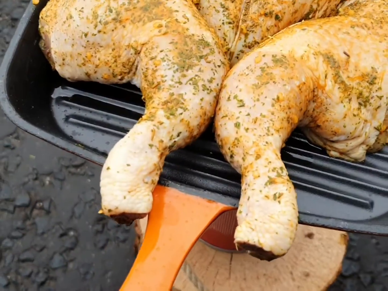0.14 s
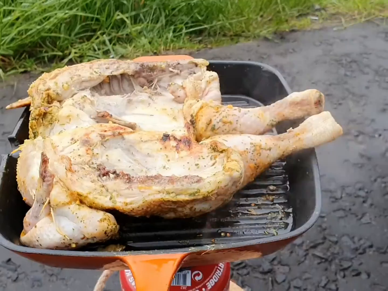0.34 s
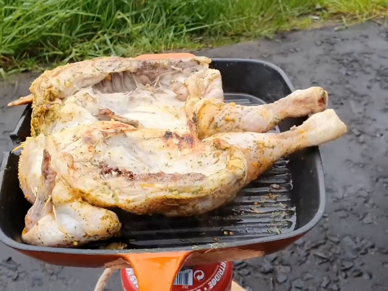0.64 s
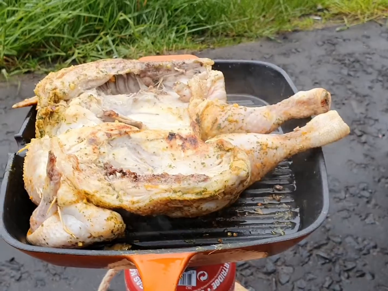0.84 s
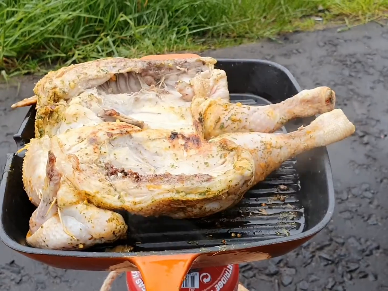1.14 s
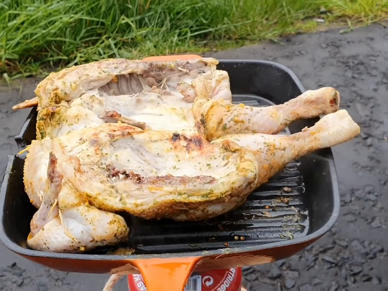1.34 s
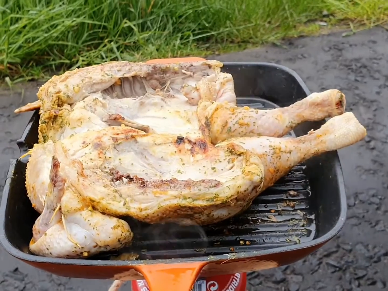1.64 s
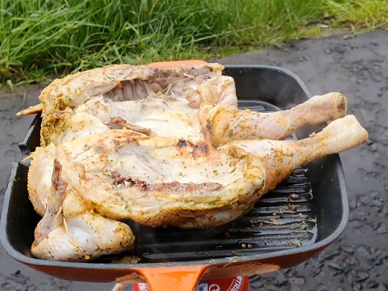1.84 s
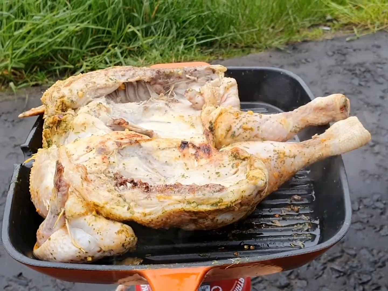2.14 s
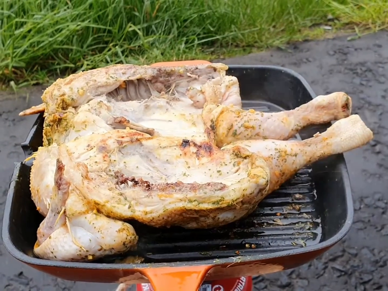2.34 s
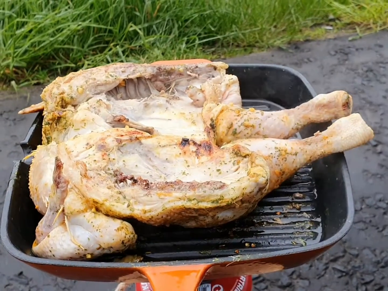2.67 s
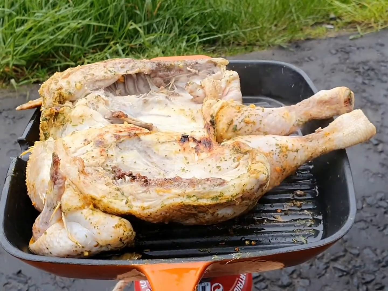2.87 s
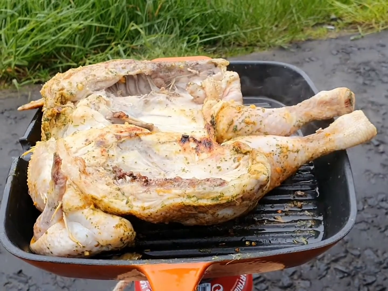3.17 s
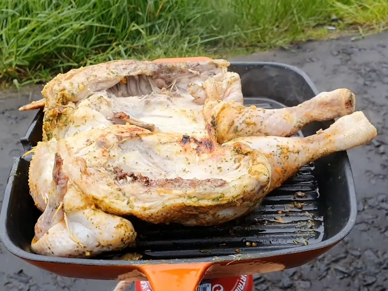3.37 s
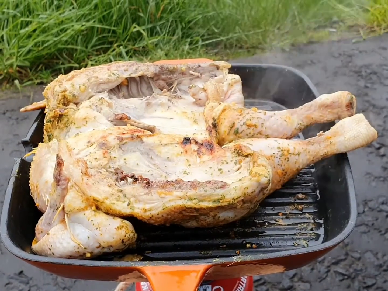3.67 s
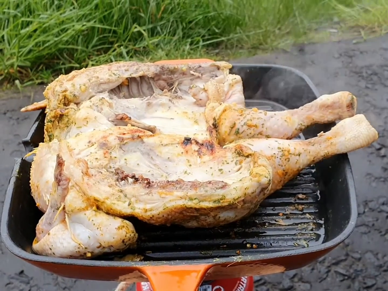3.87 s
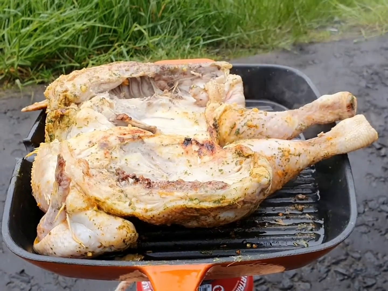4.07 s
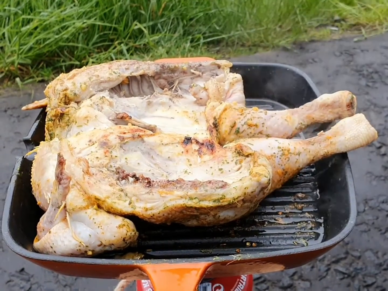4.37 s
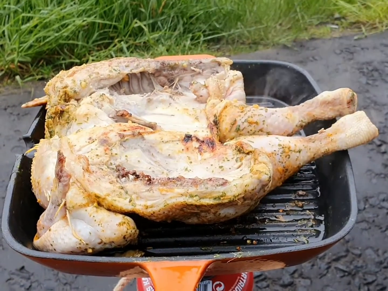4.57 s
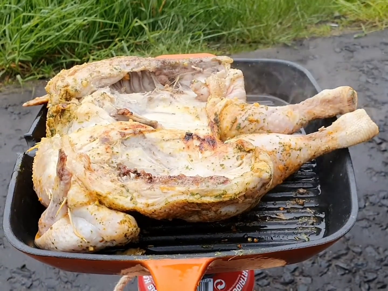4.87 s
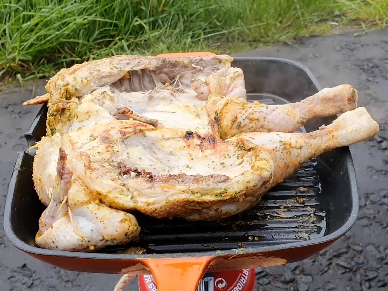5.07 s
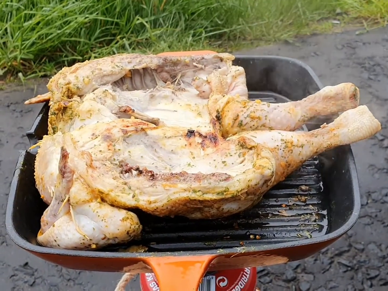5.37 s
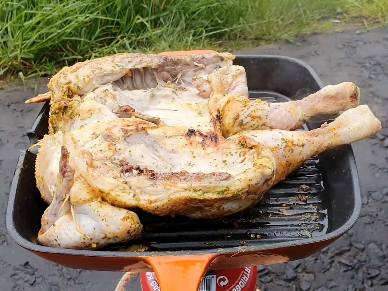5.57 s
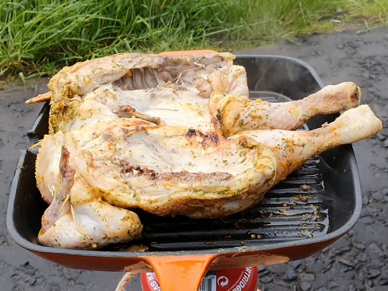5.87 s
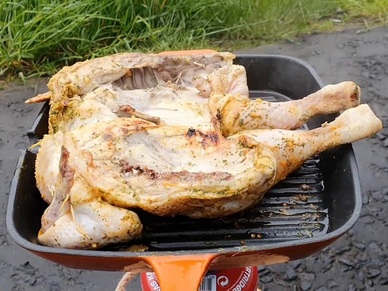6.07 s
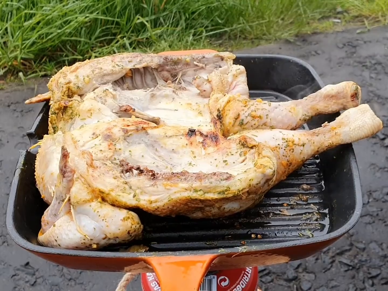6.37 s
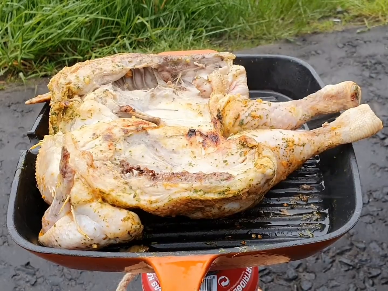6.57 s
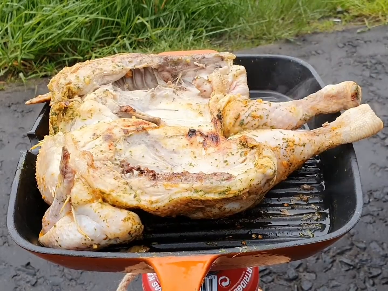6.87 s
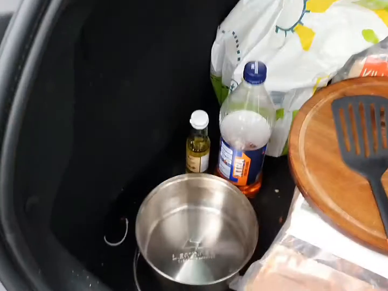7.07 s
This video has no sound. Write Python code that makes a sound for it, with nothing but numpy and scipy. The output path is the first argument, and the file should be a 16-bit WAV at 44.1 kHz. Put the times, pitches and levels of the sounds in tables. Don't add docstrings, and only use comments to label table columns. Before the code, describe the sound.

A hand-held stereo microphone sits an arm's length from a frying pan on an outdoor gas stove. First comes a snippet of sizzle with low wind buffeting mainly on the left and faint rustling; after a blink of silence, continuous wet frying follows, irregularly scattered with dry cracks, rounder ringing pops and tiny spits. Underneath lie soft burner roar, traffic murmur and a wavering far engine. It cuts briefly again at the end.

```python
import sys
import numpy as np
from scipy import signal
from scipy.fft import rfft, irfft, next_fast_len
from scipy.io import wavfile
from scipy.ndimage import map_coordinates

SR = 44100
rng = np.random.default_rng(int(sys.argv[2]) if len(sys.argv) > 2 else 0)


def wav_out(sig):
    wavfile.write(sys.argv[1], SR, np.round(np.clip(np.atleast_2d(sig).T, -1, 1) * 32767).astype(np.int16))


def invert_db(x):
    u = np.asarray(x, float) / 20
    return 10 ** u


N = 318519


def unit(x):
    return x / np.sqrt(np.mean(x ** 2) + 1e-20)


def along(points, hz):
    f, v = np.transpose(points)
    return np.interp(np.log(hz + 1), np.log(f + 1), v)


def curves(rows):
    s, *cols = np.transpose(rows)
    return [np.interp(np.arange(N) / SR, s, c) for c in cols]


def wobble(rate):
    knots = rng.standard_normal(int(N * rate / SR) + 4)
    return map_coordinates(knots, [np.arange(N) * rate / SR])


def swell(s, half_s):
    return np.exp(-.5 * ((np.arange(N) / SR - s) / half_s) ** 2)


def filtered(x, response):
    n = x.shape[-1]
    m = 2 * next_fast_len(n // 2 + 4096, real=True)
    return irfft(rfft(x, m) * response(np.fft.rfftfreq(m, 1 / SR)), m)[..., :n]


def coloured_noise(points):
    return filtered(rng.standard_normal((2, N)), lambda f: invert_db(along(points, f)))


# frequency in Hz, level in dB per Hz.
MURMUR_SPECTRUM = [(15, -51), (30, -27), (40, -15), (62, -8), (85, -6.5), (107, -11), (134, -14),
                   (189, -10), (389, -20), (557, -12.5), (900, -24.5), (1170, -41), (1980, -120)]


def outdoor_murmur():
    mid, side = coloured_noise(MURMUR_SPECTRUM)
    side = filtered(side, lambda f: invert_db(along([(100, -18.5), (300, -18.0), (700, -8.5)], f)))
    growth_db = 0.4453 * np.arange(N) / SR
    level_db = -51.5 + growth_db + 0.85 * wobble(1.55) + 0.75 * wobble(5)
    return invert_db(level_db) * np.array([mid + side, mid - side]) / np.std(mid)


# centre in seconds, half length in seconds, level in dB.
RUSTLE_SWELLS = [
    (.05, .08, -55),
    (.33, .06, -53),
    (2.58, .09, -59),
]
# frequency in Hz, level in dB.
RUSTLE_SPECTRUM = [(150, -40), (260, 0), (400, 0), (600, -40)]


def rustle():
    near, far = unit(coloured_noise(RUSTLE_SPECTRUM))
    level = sum(invert_db(db) * swell(s, half_s) for s, half_s, db in RUSTLE_SWELLS)
    return level * (near + .4 * far * np.array([[1], [-1]]))


# time in seconds, note in Hz, level in dB.
ENGINE_PATH = [(.42, 78.7, -43), (1.45, 79.2, -42), (1.9, 82, -45), (2.2, 83.3, -38.5), (2.7, 84.7, -45.5),
               (3.3, 86.7, -39.5), (4.05, 89.2, -39), (4.6, 89.4, -41.5), (5.05, 89.5, -42),
               (5.7, 92.5, -39.5), (6, 92.4, -41.5), (6.3, 93.5, -40.5), (7.1, 93.3, -38)]
# time in seconds, depth of the lull in dB.
ENGINE_LULLS = [(.42, 10), (1.27, 6), (1.72, 12), (2.03, 8), (2.79, 12), (2.97, 17), (3.36, 8), (3.65, 7),
                (4.1, 6), (4.27, 14), (5.03, 4), (5.23, 2), (5.87, 8), (6.5, 15), (6.76, 8)]


def engine_drone():
    hz, db = curves(ENGINE_PATH)
    t = np.arange(N) / SR
    for s, depth_db in ENGINE_LULLS:
        fade_or_return_s = np.where(t < s, 0.048, 0.074)
        db = db - depth_db * np.exp(-np.abs(t - s) / fade_or_return_s)
    phase = 2 * np.pi * np.cumsum(hz + .5 * wobble(12)) / SR
    note = invert_db(db + 0.5) * np.sin(phase)
    octave = invert_db(-65.0 + 5.3 * wobble(8)) * np.sin(2 * phase + 0.89 * wobble(20))
    return (note + octave) * ((t > SHOTS[0][1]) & (t < SHOTS[2][0]))


# time in seconds, level in dB.
GUST_LEVEL = [(0.0, -45), (0.056, -50), (0.112, -61), (0.134, -40), (0.178, -47), (0.21, -40), (0.256, -35),
              (0.296, -46), (0.36, -47)]
# frequency in Hz, level in dB.
BUFFET_SPECTRUM = [(28, -25), (45, 0.5), (100, -5.5), (220, -7.5), (400, -17.5), (800, -46)]
# centre in seconds, half length in seconds, Hz, level in dB.
EDDIES = [
    (.21, .014, 58, -29),
    (.268, .016, 62, -29),
    (.24, .008, 200, -25),
    (.254, .006, 150, -22),
    (.278, .008, 110, -30),
]


def gust():
    lumps = unit(coloured_noise(BUFFET_SPECTRUM))
    t = np.arange(N) / SR
    flaps = sum(invert_db(db) * swell(s, half_s) * np.cos(2 * np.pi * hz * (t - s)) for s, half_s, hz, db in EDDIES)
    flaps = flaps * invert_db([[0], [-14]])
    first = invert_db(curves(GUST_LEVEL)[0] + [[5], [-6]]) * lumps * (t < SHOTS[0][1])
    last = invert_db(-55) * lumps * [[.2], [1]] * (t > SHOTS[2][0] - .01)
    return flaps + first + last


def steam_bursts(rate, spread_db, life_ms, hiss):
    hits = rng.random(N) < rate / SR * invert_db(4.2 * wobble(10))
    sizes = hits * invert_db(spread_db * np.minimum(rng.exponential(size=N), 2.6))

    def dying(ms):
        return unit(signal.lfilter([1], [1, -np.exp(-1000 / (ms * SR))], sizes))

    direct = rng.standard_normal(N) * (dying(life_ms) + hiss)
    scattered = np.diff(rng.standard_normal((2, N + 1))) * (dying(3 * life_ms) + hiss)
    return direct + 0.54 * scattered


def lagged(x, lag_ms, hz=None):
    delays_s = np.array([[0], [lag_ms / 1000]])

    def response(f):
        bubble = 1 if hz is None else 1j * f * hz / (hz * hz - f * f + 1.4j * f * hz)
        return bubble * np.exp(-2j * np.pi * f * delays_s)

    return filtered(x, response)


# time in seconds, heat in dB, wetness (high fizz) in dB.
FRYING = [(0, -40.5, -48), (.24, -38, -51), (.36, -39, -56), (.42, -39.5, -41.5), (1.11, -38.5, -40.5),
          (1.5, -36.5, -44.5), (2.07, -39.5, -51), (2.37, -39.5, -59), (2.5, -37, -47), (3.06, -40, -41),
          (3.49, -38, -49), (3.8, -36, -38), (4.04, -40, -45), (4.88, -39, -41), (5.1, -38.5, -40),
          (6.42, -39.5, -43.5), (7.09, -40.5, -39.5), (7.14, -33.5, -53)]
# lag of the right port in ms, bubble resonance in Hz, level in dB.
FAT_PATCHES = [(.04, 1490, 1), (0.099, 4100, 4), (.2, 2280, 1.5), (.27, 6000, 3.5), (.14, 12500, 1),
               (.35, 3400, 3)]


def sizzle():
    heat_db, wet_db = curves(FRYING)
    out = np.zeros((2, N))
    for lag_ms, hz, db in FAT_PATCHES:
        base_db = wet_db + 6.5 if hz > 8000 else heat_db - 7.0
        level = invert_db(base_db + db + 1.44 * wobble(6))
        steam = steam_bursts(rate=400, spread_db=5.0, life_ms=0.41, hiss=0.66)
        out += level * unit(lagged(steam, lag_ms, hz))
    return out * invert_db(0.78 * wobble(14))


# start in seconds, peak in dB, cavity in Hz, crack
# over it in dB.
SLOW_DROPS = [(0.0446, -15, 1770, -14), (.0498, -2.5, 2320, -17), (0.0589, -19, 1880, -5),
              (0.0633, -19, 1890, -1), (0.0954, -22.5, 2100, -5.5), (.177, -10, 1800, -19),
              (0.205, -19, 1820, -10),
              (1.1626, -5, 1160, -12), (1.5767, -20.5, 1160, -14), (2.031, -20.5, 1710, -14),
             (2.046, -16.5, 1190, -12), (2.2972, -14, 2170, -14.5), (2.7896, -19.5, 1680, -8),
             (3.052, -24.5, 1230, -4), (3.1336, -18, 1290, -14), (3.136, -18, 2000, -9),
             (3.144, -5.5, 1800, -14), (3.3328, -26, 1153, -21), (3.607, -17.5, 1190, -26),
             (3.6731, -27, 1530, -8), (3.7392, -9.5, 1760, -18), (4.0642, -15, 1990, -22),
             (4.6608, -17.5, 1182, -8), (4.795, -18, 1168, -11.5), (4.8174, -14.5, 1474, -12),
             (5.0592, -18, 1180, -5), (5.268, -14.5, 2040, -17), (5.3745, -25, 1170, -15),
             (5.526, -20, 1874, -5), (5.5318, -13.5, 1510, -23), (5.688, -18.5, 1770, -8),
             (5.8526, -12.5, 2000, -13), (5.9426, -16, 1260, -19), (6.016, -22, 1130, -6),
             (6.108, -19, 2030, -11), (6.7256, -15, 2310, -11), (6.971, -14, 1550, -18),
             (7.1498, -21, 2366, -4)]
LARGEST_S = [.0498, .177, 1.1626, 1.1665, 2.046, 2.443, 2.6, 3.144, 3.478, 4.2459, 4.91]
# level in
# dB, ring in Hz.
LARGEST_PAN_RINGS = [
    [(-20, 690), (-6, 1780), (-15, 3400), (-13, 5400)],
    [(-23, 690), (-21, 3100)],
    [(-12, 950), (-19, 1500), (-11, 3400)],
    [(-13, 1100)],
    [(-15, 2200), (-18, 3400)],
    [(-21, 2000), (-21, 1100)],
    [(-12, 6300)],
    [(-21, 330), (-9, 2200), (-15, 6000), (-14, 1200), (-13, 2700)],
    [(-13, 3600)],
    [(-14, 1700)],
    [(-14, 5400), (-27, 1500)],
]
# start in seconds, peak in dB, cavity in Hz.
SOFT_DROPS = [(1.0131, -23, 2300), (1.7983, -28, 1170), (1.8292, -29, 1180), (2.2872, -24, 1810),
              (2.3804, -29, 1740), (2.9412, -29, 1200), (3.3927, -26, 1730), (3.8067, -24, 1540),
              (3.8114, -25, 2020), (3.8274, -28, 1510), (3.8596, -26, 2050), (4.4777, -29, 1190),
              (4.5765, -27, 1550), (5.7708, -28, 1180), (5.9758, -25, 1190), (6.1015, -28, 1540),
              (6.6104, -24, 1180), (6.7131, -27, 2310)]
# start in seconds, peak in dB, crack in Hz, spit over it in dB.
QUICK_DROPS = [(0.5031, -15.5, 4300, -11), (1.036, -14, 4250, -20), (1.0868, -4.5, 3440, -20.5),
               (1.096, -5, 4600, -25), (1.437, -15, 4200, -21), (1.7055, -10.5, 4600, -27),
               (2.355, -18, 3530, -26), (2.443, -11, 4060, -30), (2.6, -8, 6400, -13),
               (2.8564, -21.5, 3280, -8.5), (2.998, -18, 4200, -14), (3.4771, -14, 4090, -15.5),
               (3.5304, -14, 4500, -23), (4.0162, -27, 3233, -11), (4.2459, -3, 4180, -24),
               (4.4494, -19, 4240, -13), (4.8534, -15, 6330, -16), (4.91, -6.5, 4210, -26),
               (4.9747, -14, 4080, -19), (5.0384, -14, 4130, -17), (5.3017, -18, 4270, -12),
               (5.4954, -19, 4400, -20), (5.668, -12, 3990, -22), (5.6734, -12, 4190, -18),
               (5.6927, -14, 4206, -15.5), (5.887, -22, 4570, -17), (5.9895, -11.5, 6400, -16.5),
               (6.1841, -10.5, 6600, -18.5), (6.445, -15, 4270, -31), (6.774, -12.5, 4900, -13)]
# start in seconds, peak in dB, crack in Hz.
SMALL_DROPS = [(0.5916, -24, 4130), (0.6335, -24, 3360), (0.8031, -22, 4140), (0.9662, -24, 6040),
               (0.992, -17, 4500), (1.228, -22, 3820), (1.287, -31, 3880), (1.3114, -27, 3180),
               (1.4027, -24, 4120), (1.4182, -16, 4170), (1.481, -21, 4250), (1.5688, -24, 4130),
               (1.6736, -21, 3450), (1.7554, -21, 4240), (1.846, -22, 3320), (1.935, -18, 4160),
               (1.9755, -20, 4090), (1.9896, -20.5, 3610), (2.1715, -22, 4540), (2.3451, -24, 3510),
               (2.3815, -25, 4480), (2.4618, -21, 3160), (2.584, -16, 5980), (2.6404, -22, 4130),
               (2.7482, -20, 5300), (2.919, -18.5, 4210), (2.9617, -21, 3350), (3.0054, -22, 4260),
               (3.1875, -18, 3990), (3.2627, -15, 4030), (3.6436, -33, 4240), (3.7818, -20, 3900),
               (3.8921, -23, 4330), (4.1276, -21.5, 3410), (4.189, -21, 4160), (4.2948, -18.5, 4440),
               (4.4594, -22, 4270), (4.519, -23, 3240), (4.5535, -21, 4180), (4.6209, -23, 3520),
               (4.6915, -21, 4250), (4.7222, -21, 3990), (4.802, -19, 3860), (4.9512, -20, 3840),
               (5.0065, -20, 3310), (5.136, -20, 4000), (5.3353, -17, 6310), (5.583, -22, 3210),
               (5.7285, -20.5, 3900), (5.824, -22, 3780), (6.133, -20, 4210), (6.2675, -17.5, 3260),
               (6.358, -21, 3220), (6.5166, -23, 3300), (6.6692, -16, 6540), (6.7989, -22, 3440),
               (6.8378, -17.5, 4240), (6.9027, -25, 4500), (6.9353, -21, 3990), (6.9883, -22, 3720),
               (.8194, -23, 4100), (1.0424, -20, 4200), (3.1667, -24, 3470), (3.6436, -24, 4200),
                    (3.6874, -20, 3130), (3.7864, -21, 3910), (3.7944, -22, 3560), (4.2406, -21, 4210),
                    (4.2594, -25, 4140), (6.2487, -21, 3310)]
# start in seconds, peak in dB.
DROPLETS = [(0.0548, -26), (0.058, -23), (0.0614, -27), (0.1431, -35), (0.2059, -35), (0.2249, -20.5),
            (0.2773, -29), (0.2964, -39), (0.3157, -31), (0.9258, -28), (1.0256, -24), (1.067, -19),
            (1.3379, -23), (1.4985, -24), (2.0038, -20), (2.2667, -26), (2.8444, -28), (2.9098, -25),
            (3.1038, -18), (3.3328, -23), (3.6731, -17.5), (3.8731, -26), (4.0163, -22), (4.0662, -29),
            (4.0921, -23), (4.4268, -23), (4.4488, -21.5), (4.5755, -21), (5.03, -18.5), (5.2879, -22),
            (5.3353, -23), (5.3742, -20), (5.4565, -26), (5.5483, -27), (6.1419, -19.5), (6.537, -27),
            (2.4962, -28), (3.0669, -27), (3.1697, -26), (3.2176, -24), (3.6257, -27), (3.9774, -28),
                 (3.9958, -27), (4.56, -28), (4.8329, -25), (4.8773, -29), (4.8928, -27), (5.1427, -28),
                 (6.3854, -29), (7.0404, -24)]


def drops():
    any_cavity = lambda: rng.uniform(1400, 2500)
    any_crack = lambda: rng.uniform(2630, 4500)
    off = -60
    rows = []
    for s, db, hz, up in SLOW_DROPS:
        rows.append((s, db - 2.5, db + up + 10.5, db + up + 3.5, hz, any_crack()))
    for s, cavities in zip(LARGEST_S, LARGEST_PAN_RINGS):
        for db, hz in cavities:
            thud_db, crack_db = (db, off) if hz < 2630 else (off, db)
            rows.append((s, thud_db, crack_db, off, hz, hz))
    for s, db, hz in SOFT_DROPS:
        rows.append((s, db + 3, db - 5, off, hz, any_crack()))
    for s, db, hz, up in QUICK_DROPS:
        rows.append((s, db - 18, db, db + up + 13.5, any_cavity(), hz))
    for s, db, hz in SMALL_DROPS:
        rows.append((s, db - 14.4, db + 1, db - 3, any_cavity(), hz))
    for s, db in DROPLETS:
        rows.append((s, off, off, db + 6.5, 2630, 4500))
    return rows


# width over pitch, time to fall 60 dB in seconds, trim in dB.
DROP_PARTS = [
    (0.3, 0.011, -2.5),
    (0.6, 0.0043, .5),
    (0.91, 0.0079, 3.5),
]
# lag in ms, shade in dB.
RIGHT_PORT = [
    (.11, 0),
    (.2, -5),
    (.1, -3),
]


def pops():
    parts = np.zeros((3, 2, N + SR))
    t = np.arange(SR // 32) / SR
    shock_s = .0008
    for s, thud_db, crack_db, spit_db, thud_hz, crack_hz in drops():
        at = round((s + shock_s) * SR)
        noise = rng.standard_normal((3, 3, len(t)))
        noise[:, 0, :2] = [[12, -7], [-18, 14], [-5, 3.5]]
        pitches, levels = (thud_hz, crack_hz, 12500), (thud_db, crack_db, spit_db)
        for k, (wide, t60, trim_db) in enumerate(DROP_PARTS):
            direct = invert_db([[0], [RIGHT_PORT[k][1]]]) * noise[k, 0] * invert_db(-60 * t / t60)
            scattered = 0.3 * noise[k, 1:] * invert_db(-60 * t / (t60 + 0.035))
            puff = signal.lfilter(*signal.iirpeak(pitches[k], 1 / wide, SR), direct + scattered)
            parts[k, :, at:at + len(t)] += invert_db(levels[k] + trim_db) * puff / np.abs(puff).max()
    return sum(lagged(part[:, :N], lag_ms) for part, (lag_ms, _) in zip(parts, RIGHT_PORT))


def pan_and_port(points, modes):
    def response(f):
        gain = invert_db(along([(100, -49)] + list(points) + [(17000, -44)], f))
        gain *= 1 + sum(invert_db(db) * w / np.hypot(w, 2 * (f - c)) for c, w, db in modes)
        cep = irfft(np.log(gain / np.sqrt(np.mean(gain ** 2))))
        half = len(cep) // 2
        folded = np.r_[cep[0], 2 * cep[1:half], np.zeros(half)]
        return np.exp(rfft(folded))
    return response


# start in seconds, end in seconds.
SHOTS = [
    (0, .366),
    (.413, 7.1),
    (7.138, 7.3),
]
# frequency in Hz, left in dB, right in dB.
FIRST_COLOUR = [(430, 1.5, 4), (640, 2.5, 2), (980, -8, 1.5), (1320, -7, -8), (1800, -6.5, 3),
                (2700, -13, -9), (3400, -7, -4.5), (5540, -4.5, -10), (7500, -14.5, -26), (8300, -13, -47),
                (12500, -8, -10), (15300, -8, -8)]
# frequency in Hz, level in dB.
LONG_LEFT = [(400, -14), (560, -4.5), (900, -12), (1500, -0.5), (2300, -1.5), (2900, -1.5), (3400, 2),
             (4800, -5), (6400, 0.7), (7000, -6.5), (7500, -18.5), (8000, -10), (10700, -7.5), (12800, -2),
             (15300, -9.5)]
# frequency in Hz, level in dB.
LONG_RIGHT = [(400, -18.5), (560, -0.5), (950, -9.5), (1200, -3), (2050, 5), (2700, -1), (3500, -11),
              (4200, -3), (6200, -7.5), (7100, -15.5), (8200, -50), (8900, -17), (10400, -5.5), (15300, -9)]
# frequency in Hz, left in dB, right in dB.
LAST_COLOUR = [(200, -10, -12), (350, 5.5, 2), (1000, -4, -4), (2995.8, -6, -8), (4980, -7.5, -14),
               (7500, -18, -46), (9000, -18, -34), (13100, -12, -22), (15300, -18, -33)]
# frequency in Hz, width in Hz, level in dB.
FIRST_MODES = [(630, 30, 11), (1950, 90, 7.9), (2430, 130, 4.6), (3400, 540, 2.6)]
# frequency in Hz, width in Hz, level in dB.
LONG_MODES = [(1160, 65, 8), (4320, 390, 0), (1550, 40, -9)]


def ports(x):
    side = lambda rows, k: [(r[0], r[k]) for r in rows]
    views = [
        (side(FIRST_COLOUR, 1), side(FIRST_COLOUR, 2), FIRST_MODES, [-2, -3]),
        (LONG_LEFT, LONG_RIGHT, LONG_MODES, [-1, -4.5]),
        (side(LAST_COLOUR, 1), side(LAST_COLOUR, 2), [], [-7.5, -9.5])]
    out = np.zeros((2, N))
    for (start, end), (left, right, modes, db) in zip(SHOTS, views):
        shot = slice(max(0, int((start - .015) * SR)), int((end + .015) * SR))
        for k, colour in enumerate((left, right)):
            out[k, shot] += invert_db(db[k]) * filtered(x[k, shot], pan_and_port(colour, modes))
    return out


def scene():
    background = outdoor_murmur() + rustle() + engine_drone() + gust()
    return background + ports(sizzle() + pops())


def roll_off(x):
    return signal.sosfilt(signal.butter(12, 16660, fs=SR, output="sos"), x)


def record(dry):
    t = np.arange(N) / SR
    gate = np.zeros(N)
    for start, end in SHOTS:
        rise = np.clip((t - start) / 0.0009, -6, 0)
        fade_in = invert_db(20 * rise) * (rise > -6)
        remnant = invert_db(-63 - 3000 * np.clip(t - end, 0, 1)) * (t < end + .018)
        gate += fade_in * np.where(t < end, 1, remnant)
    cut = dry * gate
    clipped = cut / (1 + np.abs(cut / .95) ** 4) ** .25
    band_limit = [(15300, 1.5), (15700, -8), (16500, -16), (16800, -90)]  # (Hz, dB)
    mix = filtered(clipped, lambda f: invert_db(along(band_limit, f)))
    return roll_off(mix)


dry = scene()
out = record(dry)
wav_out(out)
```